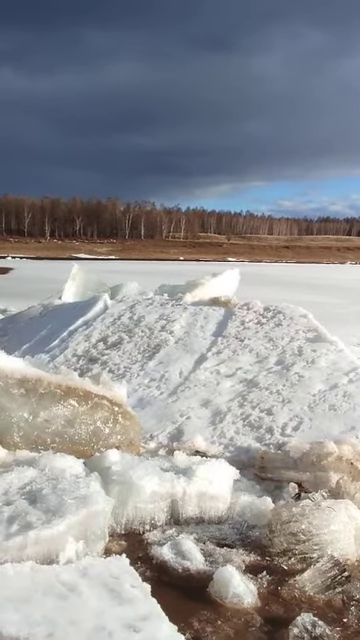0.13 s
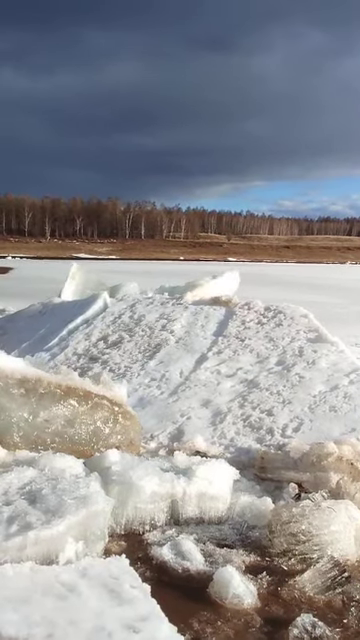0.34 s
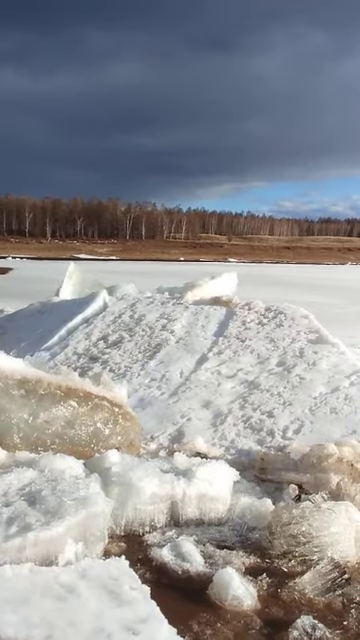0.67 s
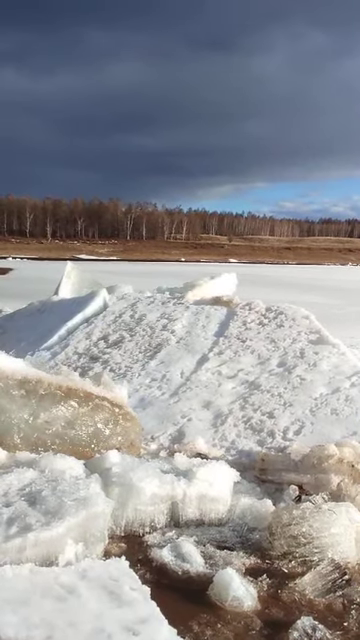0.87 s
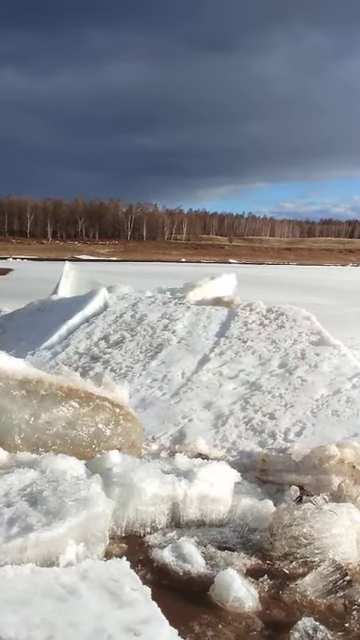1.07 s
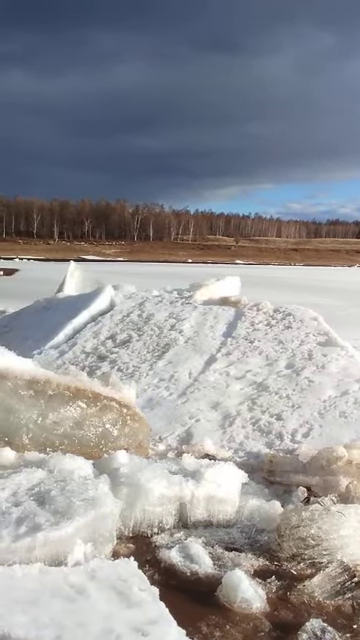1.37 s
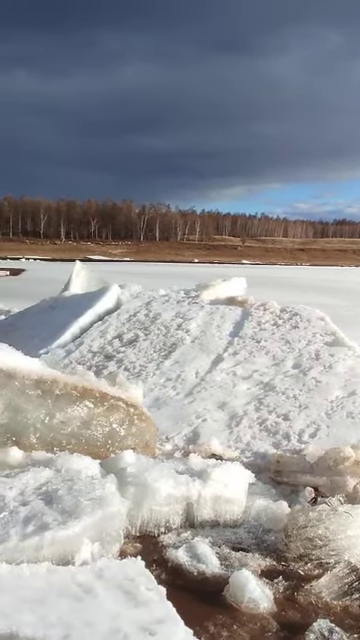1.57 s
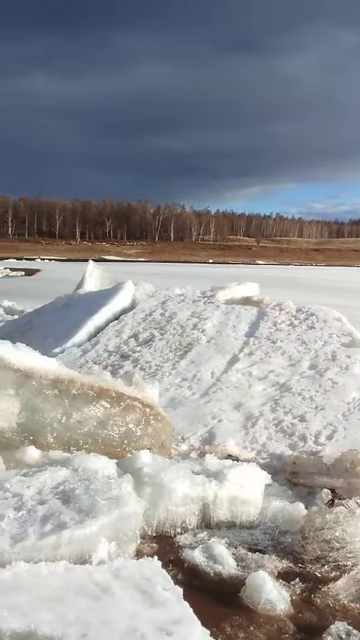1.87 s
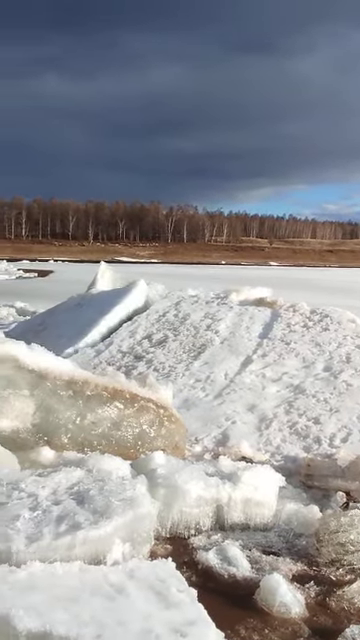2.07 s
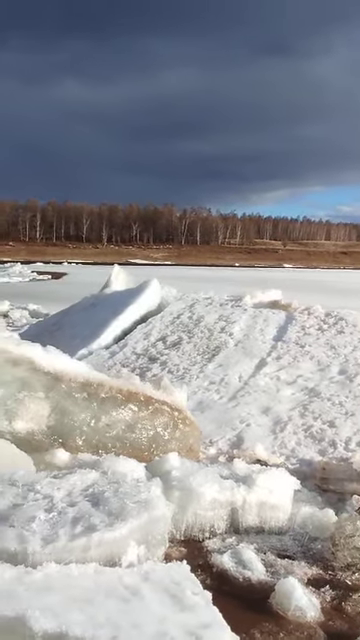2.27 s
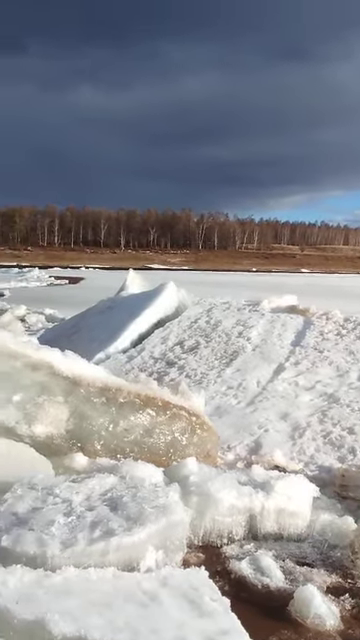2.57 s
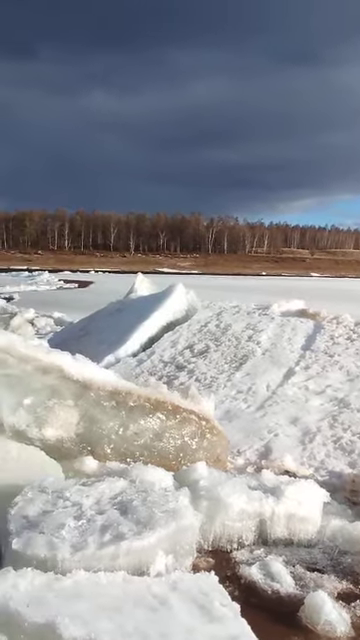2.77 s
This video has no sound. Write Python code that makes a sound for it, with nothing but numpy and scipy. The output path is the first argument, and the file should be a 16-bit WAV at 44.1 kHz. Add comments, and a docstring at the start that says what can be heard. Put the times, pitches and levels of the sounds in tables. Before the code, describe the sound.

Gusty wind buffets and rumbles on the microphone over a faint hiss of water and ice

```python
"""Gusty riverbank, ice drift

Up close, wind buffets the two microphone ports, each in its own way: noise bands follow each port's airflow
and slide up in pitch as it rises, over a deep rumble and single pressure bumps.
Behind the wind, moving water and crumbling ice make a wide hiss of filtered noise, fine grains and tiny ticks.
Now and then ice clicks in decaying noise bursts, crunches once, or rings as narrow-band noise."""
import sys
import numpy as np
from scipy import signal
from scipy.io import wavfile
from scipy.ndimage import uniform_filter1d, minimum_filter1d

SR = 44100
rng = np.random.default_rng(int(sys.argv[2]) if len(sys.argv) > 2 else 0)


def transcribe(u):
    """Save the signal u as a 16-bit wav file named by the first command-line argument.

    u: samples, shape (n,) or (channels, n), limited to [-1, 1]; the rate is SR.
    q: integer samples, one column per channel.
    """
    v = np.clip(np.atleast_2d(u).T, -1, 1)
    q = np.round(v * 32767).astype(np.int16)
    wavfile.write(sys.argv[1], SR, q)


N = 128772
T = np.arange(N) / SR

# hiss as recorded, with narrow notches near 9.9 and 13.4 kHz, relative spectrum: pitch_hz, density_db_per_hz
HISS_SPECTRUM = [(300, 16), (600, 8.5), (950, 3), (2000, 1), (2700, -0.5), (4400, 1), (5100, -1.5),
                 (6000, 3.5), (6800, 2), (9000, -9.5), (9900, -47), (11300, -17.5), (13400, -37.5),
                 (15300, -8.5), (16500, -8.5)]
# course of the hiss before HISS_DB is added: time_s, level_db
HISS_COURSE = [(0, -53), (.55, -52.5), (.7, -54.5), (1.16, -52.5), (1.45, -54.5), (2.05, -54.5),
               (2.35, -51), (2.5, -54), (2.92, -54.5)]
# placing of the hiss between the ports: pitch_hz, left_minus_right_db
HISS_BALANCE = [(500, 1.5), (2000, 0), (6500, -7), (11500, 0), (15500, -4.5)]
# how alike the two ports hear the hiss: pitch_hz, correlation (no unit)
HISS_LIKENESS = [(1400, 0.72), (2400, 0.1), (6200, 0.14)]
HISS_DB, HISS_FLICKER_DB, HISS_FLICKER_HZ = 7, 2.0, 19.3
FIZZ_DB, GRAINS_PER_S, GRAIN_SPREAD_DB = -10, 520, 5.5
TICKS_DB, TICKS_PER_S, TICK_DECAY_S = -16, 17, .002

# ice clicks: start_s, level_db, decay_t60_s
CLICKS = [(.412, -38, 0.025), (.519, -45, 0.015), (0.5362, -21, 0.0093), (.587, -38.5, 0.023),
          (1.103, -36.5, 0.012), (1.682, -46, 0.11), (1.725, -43.5, .025), (2.382, -39, 0.048)]
# relative spectrum of clicks and crunch as recorded, with notches near 9.8 and 13.4 kHz:
# pitch_hz, density_db_per_hz
CLICK_SPECTRUM = [(1200, -15), (3600, -4.5), (5600, 6), (7000, 2.5), (8600, -4), (9800, -37), (11500, -12),
                  (13400, -31), (15300, -9)]
# small pieces of ice that ring when knocked: start_s, level_db, pitch_hz, width_hz
SHARDS = [(0.484, -33.5, 1080, 580), (.589, -37.5, 4300, 159), (1.818, -48, 3600, 400),
          (1.832, -45, 3240, 400), (2.767, -46, 1640, 600)]
SHARD_T60_S = 0.041
ICE_PAN_DB = -7.5   # left minus right
CRUNCH_S, CRUNCH_WIDTH_S, CRUNCH_DB = 0.524, 0.016, -36.5   # ice gives way around the loudest click
CRUNCH_WANDER_DB, CRUNCH_WANDER_HZ = 1.8, 143

# changing base flow at the left port, under the puffs: time_s, level_db
FLOW_LEFT = [(0, -32.5), (.42, -26.5), (.65, -39), (1.08, -36.5), (1.24, -22.5), (1.42, -34.5), (2.92, -36)]
# changing base flow at the right port, under the puffs: time_s, level_db
FLOW_RIGHT = [(0, -14.5), (.1, -20.5), (.22, -15), (.26, -21.5), (.34, -17.5), (.44, -21), (.55, -19),
              (.61, -24), (.79, -34.5), (.9, -31.5), (.98, -17.5), (1.24, -14), (1.4, -30), (1.58, -26),
              (1.71, -53), (1.88, -39.5), (2.01, -34.5), (2.1, -26.5), (2.36, -25), (2.51, -39.5),
              (2.82, -30.5), (2.92, -21)]
# puffs of air: start_s, level_db, length_s (up to the release), port (left or right)
PUFFS = [(0.02, -10.5, 0.041, "right"), (0.03, -21, 0.016, "left"), (0.12, -11.5, 0.013, "right"),
         (0.155, -12.5, 0.018, "right"), (0.306, -20, 0.092, "left"), (0.365, -12, 0.012, "right"),
         (0.473, -16.5, 0.019, "right"), (0.655, -16.5, 0.015, "right"), (0.693, -14.5, 0.016, "right"),
         (.74, -18.5, 0.0063, "right"), (0.832, -25.5, 0.008, "right"), (0.921, -16.5, 0.019, "right"),
         (0.955, -14.5, 0.05, "right"), (1.008, -25, 0.03, "left"), (1.061, -11.5, 0.021, "right"),
         (1.131, -14, 0.02, "left"), (1.148, -11.5, 0.034, "right"), (1.185, -5.5, 0.025, "right"),
         (1.194, -15.5, 0.034, "left"), (1.283, -11.5, 0.02, "right"), (1.324, -11.5, 0.017, "right"),
         (1.447, -20, 0.012, "right"), (1.602, -19, 0.028, "right"), (1.706, -23, 0.018, "left"),
         (1.74, -18, 0.019, "left"), (1.788, -19.5, 0.012, "left"), (1.874, -18, 0.026, "left"),
         (1.902, -17.5, 0.022, "right"), (2.088, -18, .016, "left"), (2.225, -13.5, 0.019, "right"),
         (2.269, -15.5, 0.043, "right"), (2.429, -16, .017, "left"), (2.559, -21.5, 0.021, "right"),
         (2.595, -20.5, 0.038, "right"), (2.698, -21.5, 0.027, "right"), (2.71, -22, 0.025, "left"),
         (2.849, -19, .026, "right")]
PUFF_ATTACK_S, PUFF_RELEASE_S = .005, .012
REFERENCE_DB = -20   # airflow at which the turbulence spectra and rumble levels apply

# large eddies, relative spectrum at both ports: pitch_hz, density_db_per_hz
RUMBLE_SPECTRUM = [(18, -7.5), (28, 0), (45, 1.1), (70, -4), (130, -4), (220, -19)]
RUMBLE_LEFT_DB, RUMBLE_RIGHT_DB = -20.5, -23
RUMBLE_FOLLOWS_LEFT, RUMBLE_FOLLOWS_RIGHT = 0.34, 0.37   # dB of rumble per dB of airflow

# single hard buffets: centre_s, peak_db (both ports' power together), width_s, left_minus_right_db
BUFFETS = [(.046, 0, 0.0016, -23), (0.132, -6, 0.00066, -32), (0.384, -7, 0.0016, -3),
           (0.662, -14, 0.0006, -23), (.705, -7.5, 0.00071, -23), (1.062, -4, 0.0006, -27),
           (1.161, -5.5, 0.00052, -24), (1.237, -7, 0.00054, -30), (1.336, -4.5, 0.00053, -34),
           (1.483, -7.5, 0.0022, -9), (1.754, -12, 0.0029, 27), (1.891, -9.5, 0.00149, 16),
           (2.235, -5.5, 0.00067, -28), (2.2418, -4, 0.0019, -23), (2.572, -8.5, 0.003, -14),
           (2.725, -11, 0.0039, 3)]

# left port turbulence, relative spectrum at the reference airflow: pitch_hz, density_db_per_hz
TURBULENCE_LEFT = [(90, -2), (140, 7.5), (320, -11), (480, -31.5), (750, -40.5), (2400, -76)]
# right port turbulence, relative spectrum at the reference airflow: pitch_hz, density_db_per_hz
TURBULENCE_RIGHT = [(90, 4), (140, 2), (220, 0.5), (320, -2), (480, -16), (750, -28), (1200, -40),
                    (2400, -71.5)]
LEFT_DB, RIGHT_DB = 0, -0.33
LEFT_OCTAVES_PER_DB, RIGHT_OCTAVES_PER_DB = 0.0948, 0.04   # faster air makes smaller eddies
GUST_S = 0.054   # brightness follows the mean airflow level over this span
EDDY_RATE_HZ, EDDY_DB = 53.4, 4.5   # the turbulence comes in lumps

CEILING, LIMITER_S, CUTOFF_HZ = .95, .004, 15900


def from_db(db):
    """Decibels to gain."""
    return 10 ** (np.asarray(db) / 20)


def rms_one(x):
    """Scale to unit rms."""
    return x / np.sqrt(np.mean(x ** 2) + 1e-20)


def evened(x, span_s):
    """Hold the level near 1, keeping only the swings faster than the span."""
    return x / np.sqrt(uniform_filter1d(x * x, size=int(SR * span_s)) + 1e-20)


def in_time(rows):
    """A control curve at every sample."""
    return np.interp(T, *np.transpose(rows))


def at_hz(points, hz):
    """Read a table on a log-frequency axis."""
    table = np.array(points)
    return np.interp(np.log(hz), np.log(table[:, 0]), table[:, 1])


def pan(db):
    """Left and right gains of mean power 1."""
    return rms_one(from_db([[db / 2], [-db / 2]]))


def drift(rate_hz):
    """Smooth random wander of spread 1: noise through two equal low-pass poles."""
    step = 20   # samples between drawn points
    pole = np.exp(-2 * np.pi * rate_hz * step / SR)
    noise = rng.standard_normal(N // step + 2002)
    slow = signal.lfilter([1], [1, -2 * pole, pole * pole], noise)[2000:]   # drop the run-in
    return np.interp(np.arange(N) / step, np.arange(len(slow)), rms_one(slow))


def bands(low_hz, high_hz, count):
    """Steep neighbouring band-passes: (centre Hz, filter)."""
    edges = np.geomspace(low_hz, high_hz, count + 1)
    return [(np.sqrt(a * b), signal.butter(3, [a, b], "band", fs=SR, output="sos"))
            for a, b in zip(edges, edges[1:])]


def steady_noise(sos, hz):
    """One band of noise with its slow swings evened out; power in proportion to the centre frequency."""
    x = signal.sosfilt(sos, rng.standard_normal(N + SR))
    return evened(x, .012 + 2 / hz)[-N:] * np.sqrt(hz)


def dying(s, t60):
    """Sudden start at s, then exponential decay by 60 dB in t60 seconds."""
    return (T >= s) * np.exp(-np.log(1000) * np.maximum(T - s, 0) / t60)


def fizz():
    """Countless tiny ice crystals break: single-sample grains, a few louder than the rest."""
    spread = np.minimum(rng.exponential(1, N), 4)
    sizes = from_db(GRAIN_SPREAD_DB * spread) * rng.standard_normal((2, N))
    breaks = rng.random(N) < GRAINS_PER_S / SR
    return rms_one(sizes * breaks)


def ticks():
    """Now and then a larger crystal snaps: a sudden scrap of noise that dies within milliseconds."""
    starts = (rng.random(N) < TICKS_PER_S / SR) * rng.uniform(0.34, 1, N)
    decay = np.exp(-1 / (TICK_DECAY_S * SR))
    envelope = signal.lfilter([1], [1, -decay], starts + 1e-18)
    return rms_one(envelope * rng.standard_normal((2, 2, N)))


def river():
    """Wide hiss of water and grinding ice, band by band, with fine grains and ticks within it."""
    sources = []
    for snaps in ticks():
        water = rng.standard_normal((2, N))
        sources.append(water + from_db(FIZZ_DB) * fizz() + from_db(TICKS_DB) * snaps)
    out = 0
    bank = bands(300, 2400, count=6) + bands(2400, 16500, count=28)
    for k, (hz, sos) in enumerate(bank):
        # neighbouring bands take turns between two independent sources
        mid, side = signal.sosfilt(sos, sources[k % 2])
        alike = np.clip(at_hz(HISS_LIKENESS, hz), -1, 1)
        both = np.sqrt(1 + alike) * mid + np.sqrt(1 - alike) * side * [[1], [-1]]
        level_db = at_hz(HISS_SPECTRUM, hz) + HISS_FLICKER_DB * drift(HISS_FLICKER_HZ)
        out = out + both * pan(at_hz(HISS_BALANCE, hz)) * from_db(level_db)
    return rms_one(out) * from_db(in_time(HISS_COURSE) + HISS_DB)


def shard(s, db, hz, width_hz):
    """A small piece of ice rings roughly around one pitch: narrow-band noise that decays."""
    sos = signal.butter(2, [hz - width_hz / 2, hz + width_hz / 2], "band", fs=SR, output="sos")
    return from_db(db) * dying(s, SHARD_T60_S) * rms_one(steady_noise(sos, hz))


def ice():
    """Brittle clicks and one short crunch shape a coloured noise; ringing shards join them."""
    white = rng.standard_normal((2, 2, N))
    noise = 0
    for k, (hz, sos) in enumerate(bands(1200, 16500, count=20)):
        noise = noise + from_db(at_hz(CLICK_SPECTRUM, hz)) * signal.sosfilt(sos, white[k % 2])
    clicks = sum(from_db(db) * dying(s, t60) for s, db, t60 in CLICKS)
    crunch_db = CRUNCH_DB + CRUNCH_WANDER_DB * drift(CRUNCH_WANDER_HZ)
    crunch = from_db(crunch_db) * np.exp(-np.abs(T - CRUNCH_S) / CRUNCH_WIDTH_S)
    shards = sum(shard(*row) for row in SHARDS)
    return pan(ICE_PAN_DB) * (rms_one(noise) * np.hypot(clicks, crunch) + shards)


def airflow(flow, port):
    """Wind strength at one port in dB: the changing base flow plus puffs that start abruptly, hold and die away."""
    gain = from_db(in_time(flow))
    for s, db, length, where in PUFFS:
        if where == port:
            attack = np.clip((T - s) / PUFF_ATTACK_S, 0, 1)
            release = np.exp(-np.maximum(T - s - length, 0) / PUFF_RELEASE_S)
            gain = np.hypot(gain, from_db(db) * attack * release)
    return 20 * np.log10(gain)


def rumble(air_db, follows):
    """Large eddies push on one port and follow the gusts only in part."""
    noise = sum(from_db(at_hz(RUMBLE_SPECTRUM, hz)) * steady_noise(sos, hz)
                for hz, sos in bands(16, 200, count=6))
    return rms_one(noise) * from_db(follows * (air_db - REFERENCE_DB))


def buffets():
    """A vortex crosses the ports: one pressure bump with a shallow dip on each side."""
    out = np.zeros((2, N))
    for s, db, width, side_db in BUFFETS:
        u = (T - s) / width
        bump = (1 - u * u) * np.exp(-u * u / 2)
        out += pan(side_db) / np.sqrt(2) * from_db(db) * bump
    return out


def turbulence(air_db, spectrum, octaves_per_db):
    """Fluttering turbulence at one port; its spectrum slides up as the wind rises."""
    gust_db = uniform_filter1d(air_db, size=int(GUST_S * SR))
    stretch = 2 ** (octaves_per_db * (gust_db - REFERENCE_DB))
    noise = sum(from_db(at_hz(spectrum, hz / stretch)) * steady_noise(sos, hz)
                for hz, sos in bands(70, 2800, count=13))
    smooth = signal.butter(2, 2 * EDDY_RATE_HZ, fs=SR, output="sos")
    lumps = signal.sosfilt(smooth, drift(EDDY_RATE_HZ))
    return from_db(air_db) * evened(noise * from_db(EDDY_DB * lumps), .028)


def scene():
    """Wind on both ports, in front of the river and its ice."""
    background = river() + ice()
    air_left, air_right = airflow(FLOW_LEFT, "left"), airflow(FLOW_RIGHT, "right")
    left = from_db(RUMBLE_LEFT_DB) * rumble(air_left, RUMBLE_FOLLOWS_LEFT)
    left += from_db(LEFT_DB) * turbulence(air_left, TURBULENCE_LEFT, LEFT_OCTAVES_PER_DB)
    right = from_db(RUMBLE_RIGHT_DB) * rumble(air_right, RUMBLE_FOLLOWS_RIGHT)
    right += from_db(RIGHT_DB) * turbulence(air_right, TURBULENCE_RIGHT, RIGHT_OCTAVES_PER_DB)
    return background + buffets() + np.array([left, right])


def record(dry):
    """A fast limiter holds the hardest buffets under the ceiling; then the top is cut steeply."""
    allowed = np.minimum(1, CEILING / (np.abs(dry) + 1e-9))
    span = int(LIMITER_S * SR)
    lowest = minimum_filter1d(allowed, size=2 * span)
    gain = uniform_filter1d(lowest, size=span)
    low_pass = signal.ellip(10, .1, 80, CUTOFF_HZ, fs=SR, output="sos")
    return signal.sosfilt(low_pass, dry * gain)


dry = scene()
out = record(dry)
transcribe(out)
```